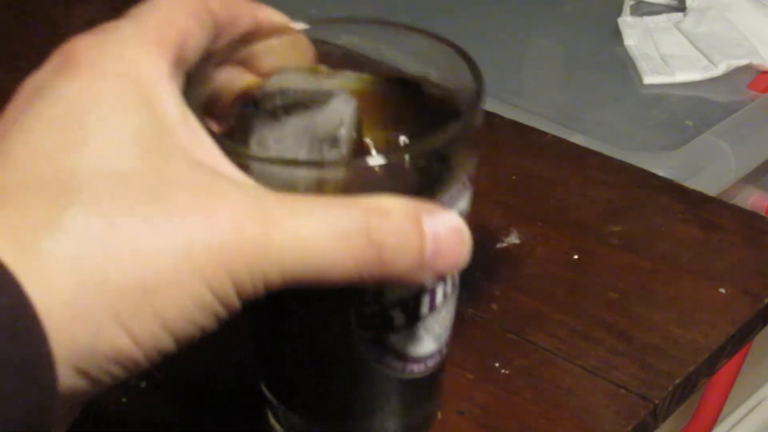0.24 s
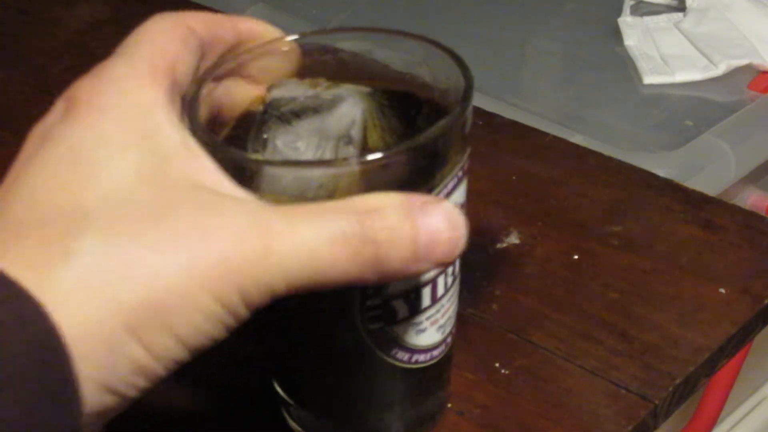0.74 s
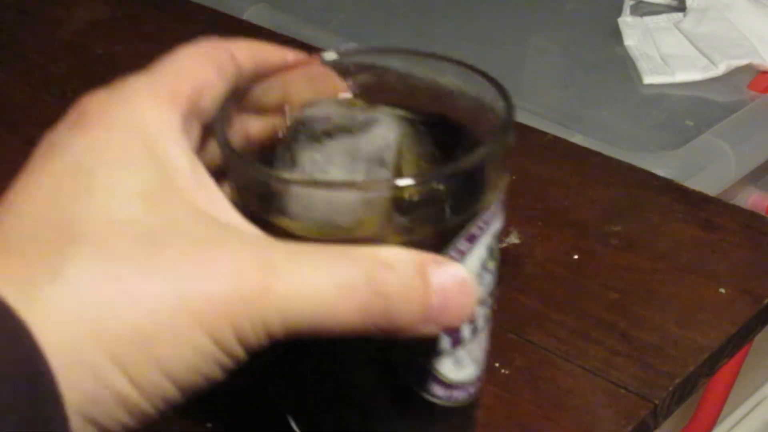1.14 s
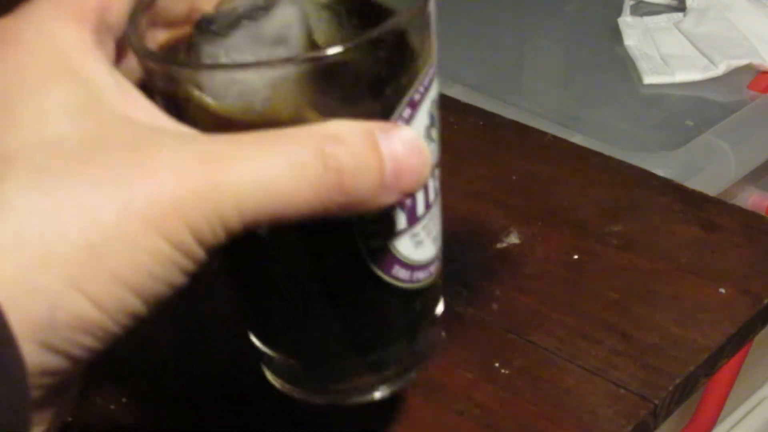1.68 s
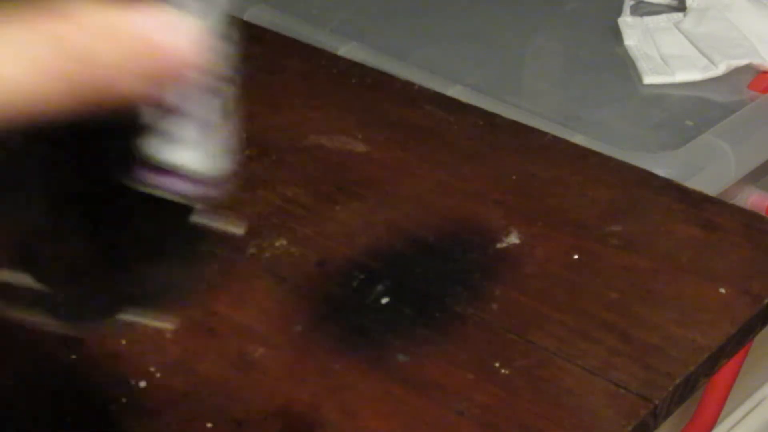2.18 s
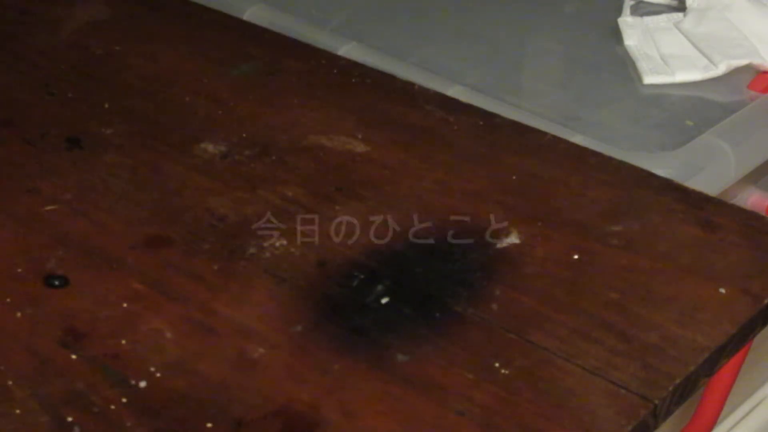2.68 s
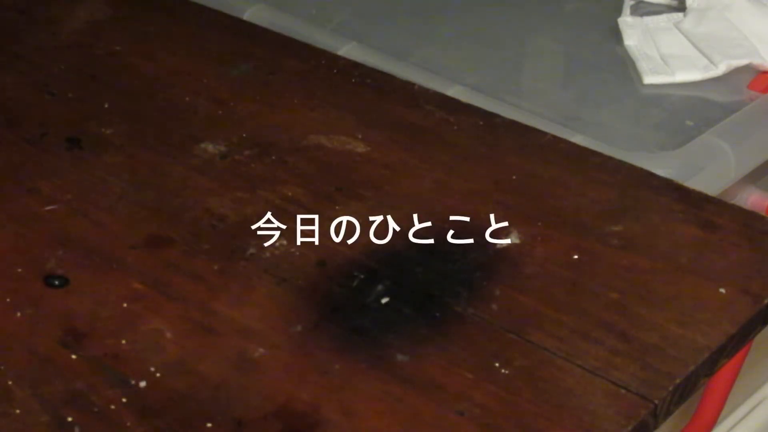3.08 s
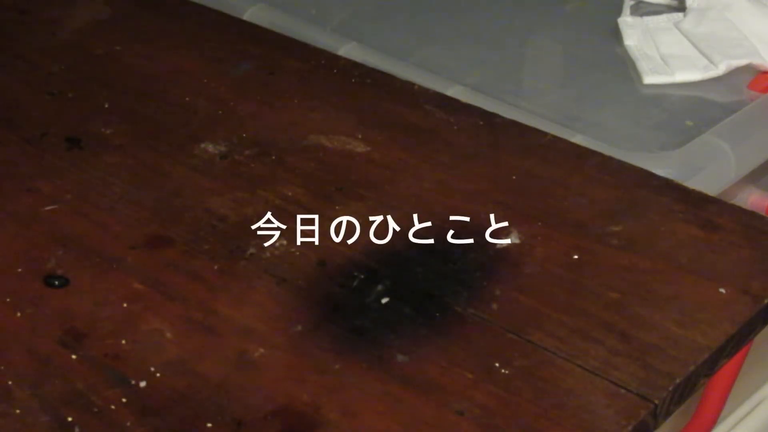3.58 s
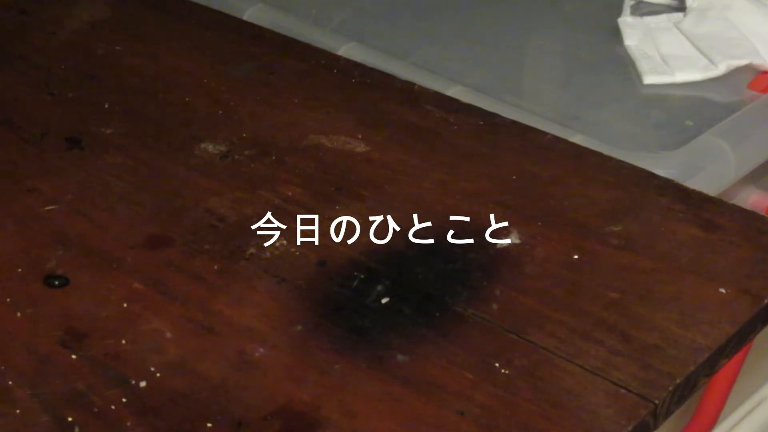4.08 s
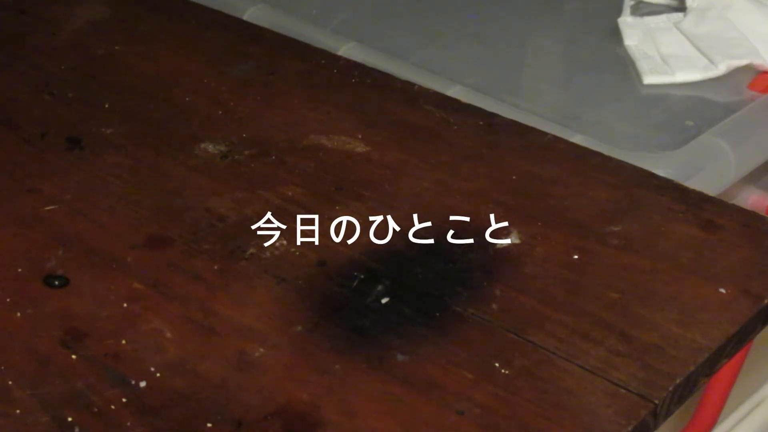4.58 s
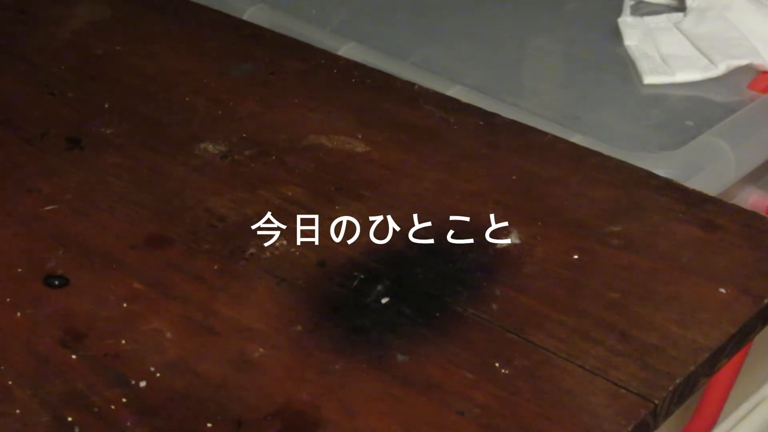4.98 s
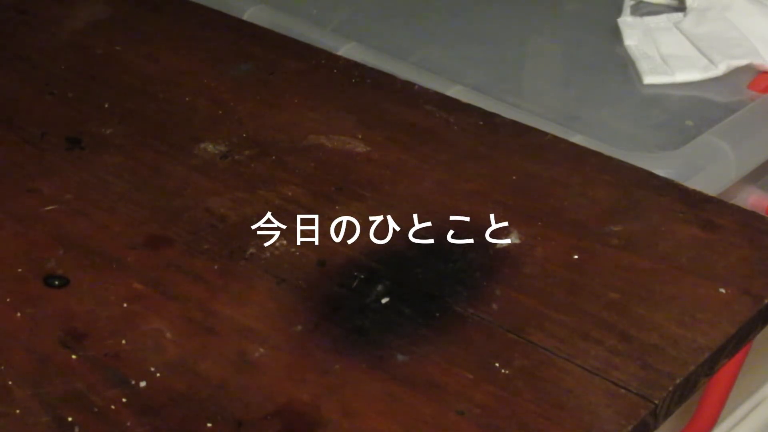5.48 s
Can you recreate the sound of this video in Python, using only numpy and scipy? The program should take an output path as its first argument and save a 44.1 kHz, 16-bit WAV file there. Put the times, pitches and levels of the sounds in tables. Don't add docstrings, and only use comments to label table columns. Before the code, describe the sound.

Ice cubes clink in a hand-held drink, the glass thuds onto a wooden table, then rattles as it is lifted away, leaving quiet dripping and motor hum.

```python
import sys
import numpy as np
from scipy import signal
from scipy.fft import rfft, irfft
from scipy.io import wavfile
from scipy.ndimage import uniform_filter1d, map_coordinates

SR = 44100
rng = np.random.default_rng(int(sys.argv[2]) if len(sys.argv) > 2 else 0)


def ratio(d):
    e = np.asarray(d, float) / 20
    return 10 ** e


def wav_out(sig):
    wavfile.write(sys.argv[1], SR, np.round(np.clip(np.atleast_2d(sig).T, -1, 1) * 32767).astype(np.int16))


N = 253134


def ice():
    # start in seconds, peak in dB, wall pitch in Hz, cube over wall in dB,
    # cube pitch in Hz.
    lowering = [(.002, -38.5, 2170, -3, 3020), (0.0505, -29.5, 2050, 8.5, 3400),
                (0.0542, -20, 2290, 0.5, 3040), (.0741, -19.5, 2110, -3, 2680),
                (0.0812, -28.5, 1960, 4.5, 3120), (0.09, -29, 2240, -11, 3330), (.118, -23, 2180, 3, 2880),
                (0.1686, -32, 2110, 8.5, 3670), (.219, -39, 2200, -4, 3090), (0.2699, -24, 2140, -1, 2770),
                (0.2768, -30, 2180, 5, 4040), (.2844, -29, 2270, -9, 3980), (0.2908, -27, 2140, -.6, 2770),
                (.333, -28.5, 2110, 2.5, 2860), (.365, -40.5, 2090, 1.5, 4140),
                (.4546, -41, 2190, 3.5, 3290)]
    # start in seconds, peak in dB, wall pitch in Hz, cube over wall in dB.
    gripping = [
        (1.0225, -40, 2280, -6),
        (1.0334, -39, 2000, -1),
        (1.0636, -27, 2150, -2),
        (1.105, -27.5, 2100, -4),
        (1.2261, -41, 2170, -11),
        (1.278, -42, 2460, -7),
        (1.327, -40, 2200, 10.5),
        (1.385, -44, 2420, 5),
        (1.3975, -34, 2080, -13),
    ]
    # start in seconds, peak in dB, wall pitch in Hz, cube over wall in dB.
    lifting = [(1.4002, -24.5, 2080, -4.5), (1.411, -36, 2120, -4), (1.448, -22, 2170, -0.4),
               (1.464, -32, 2103, -7), (1.4775, -27.5, 2110, -2.5), (1.502, -27.5, 2120, -3),
               (1.5196, -31, 2010, -2), (1.5431, -31, 2150, -1.5), (1.5698, -31, 2180, -13),
               (1.5834, -27, 2040, -8), (1.5945, -35, 2103, -2), (1.615, -28, 2200, 0.5),
               (1.679, -23.5, 2230, -5), (1.7107, -30, 2080, -1), (1.7297, -30, 2110, -8),
               (1.734, -34, 2200, -10), (1.7432, -28, 2120, 0.5), (1.7647, -25, 2160, -10),
               (1.7696, -15, 2100, -8), (1.7795, -33, 2190, -19), (1.7864, -29.5, 2136, -10),
               (1.8351, -31, 2170, -18), (1.8492, -12.5, 2190, 5.5), (1.857, -30, 2010, -18),
               (1.8634, -27, 2030, -11), (1.8798, -33, 2050, -6), (1.891, -28, 2150, -11),
               (1.8974, -35, 2050, -2), (1.9135, -32, 2100, -2), (1.925, -25.5, 2200, -7)]
    # start in seconds, peak in dB, wall pitch in Hz, cube over wall in dB,
    # cube pitch in Hz.
    tilted = [
        (5.5353, -20, 2340, -7, 3000),
        (5.541, -34, 2400, -1, 3050),
    ]
    # level under the first in dB, pitch in Hz.
    second_levels = (-18, -8, -15, -16)
    second_pitches = (5010, 5010, 5000, 5480)
    slosh_levels = (-12, -21, -30, -40)
    rim_s = [.0816, .2914, 1.5432, 1.7108, 1.7424, 1.857, 1.8974]

    out, t = np.zeros(N), np.arange(SR // 10) / SR
    phases = zip((lowering, gripping, lifting, tilted), second_levels, second_pitches, slosh_levels)
    for knocks, phase_second_db, second_hz, slosh_db in phases:
        for s, db, wall_hz, cube_db, *own_hz in knocks:
            second_db = phase_second_db + 0.64 * (cube_db + 6.5) + 3.5 * rng.standard_normal()
            if np.abs(np.subtract(rim_s, s)).min() < .003:
                second_db += 9.5
            third_db = 0.2 * second_db - 19 + 2.5 * rng.standard_normal()
            cube_hz = own_hz[0] if own_hz else 2970 * np.exp(0.078 * rng.standard_normal())
            clink = glass_wall(t, wall_hz, second_hz, second_db, third_db)
            clink += ice_cube(t, cube_hz, cube_db)
            clink += ring(t, 1140 * (1 + 0.1 * rng.standard_normal()), slosh_db, 0.016, 0.00096)
            clink += scrape(t, cube_hz, cube_db, third_db)
            add(out, s + .001, ratio(db + 2.5) * clink)
    return out


def glass_wall(t, hz, second_hz, second_db, third_db):
    wall_t60 = (0.019, 0.018, 0.010)
    shift = rng.standard_normal(4)
    wall = ring(t, hz, 0, wall_t60[0] * (2100 / hz) ** 3, .0004) * flutter(t, depth=.4)
    wall += ring(t, hz * (1.122 + 0.1 * shift[0]), -9, 0.019, 0.00039)
    second = ring(t, second_hz * (1 + .008 * shift[1]), second_db, wall_t60[1], .0002)
    wall += second * flutter(t, depth=.45)
    wall += ring(t, 8700 * (1 + .02 * shift[2]), third_db, wall_t60[2], .0003)
    return wall


def ice_cube(t, hz, db):
    # pitch in Hz, level in dB, decay to -60 dB in seconds.
    cube_modes = [(1020, -43, .012), (1430, -22, 0.013), (2566, -9, 0.02), (3050, -14, 0.015),
                  (3344, -1, 0.006), (3900, -5, 0.012), (4690, -6.5, 0.0081), (5900, -2.5, 0.0079),
                  (7380, -15, 0.008)]
    cube = ring(t, hz, db - 3.0, 0.012, 0.00043)
    for mode_hz, mode_db, t60 in cube_modes:
        detune, chance = rng.standard_normal(2)
        cube += ring(t, mode_hz * (1 + 0.067 * detune), db - 10.0 + mode_db + 2.0 * chance, t60, 0.00026)
    return cube


def scrape(t, cube_hz, cube_db, third_db):
    grit = ratio(-60 * t / [[.02], [.018]]) * rng.standard_normal((2, len(t)))
    rub = ratio(cube_db + 5.0) * band(grit[0], 0.76 * cube_hz, 1.05 * cube_hz)
    rub += ratio(third_db + 6.0) * band(grit[1], 4100, 14000)
    crack = band(ratio(cube_db + 7.5 - 60 * t / 0.00067), 2000, 7300)
    return band(band(rub - crack, 1880, 9600), 1920, 10200)


def table():
    # start in seconds, peak in dB,
    # softness (highest pitch reached) in Hz.
    set_down = [(.5638, -10, 5900), (0.5714, -16.5, 5000), (0.5796, -17.5, 1520), (0.6158, -25.5, 500),
                (.6225, -32, 900), (0.632, -33.5, 600), (.643, -49, 800), (.657, -41, 300),
                (5.564, -45, 600), (5.611, -46, 898), (5.675, -43, 600)]
    # pitch in Hz, level in dB.
    table_modes = [(90, -20), (135, -17), (195, -10), (238, -22.5), (295, -8), (409, 0.5), (528, 2.5),
                   (673, 2.5), (782, -0.5), (860, -6), (950, -14), (1032, -4), (1168, 4.5), (1297, 1.5),
                   (1440, -10), (1560, -17), (1696, -10), (1969, -4), (2130, -9), (2370, -10.5), (2690, -14),
                  (3030, -23), (3400, -20.5), (3700, -28)]
    out, t = np.zeros(N), np.arange(SR // 5) / SR
    board = np.zeros(len(t))
    for hz, mode_db in table_modes:
        board += ring(t, hz, mode_db, 0.045 * (500 / hz) ** 0.32, 0.00078, rng.uniform(0, 2 * np.pi))
    for s, db, soft_hz in set_down:
        jar = ratio(-18 - 60 * t / 0.1) * band(rng.standard_normal(len(t)), 1800, 11000)
        add(out, s, ratio(db) * band(board + jar, 80, soft_hz))
    return out


def drops():
    # start in seconds, peak in dB, low part in dB.
    near = [(.0954, -34, -3), (.1124, -35, -10), (.1265, -27.5, -8.5), (.2324, -35, -6), (.3884, -38, -15),
            (.636, -38, -3), (.6631, -30, -11), (.9861, -33.5, -7), (1.5213, -36, -2), (1.6235, -34, -23),
            (1.6529, -35.5, -2), (2.0014, -38, -4), (2.5718, -37, -15), (2.5369, -38, 1.5),
            (2.6934, -40.5, 3), (3.0505, -33.5, -22), (3.1262, -36, -7), (3.1326, -35, -1.5),
            (4.1882, -36, -5), (3.501, -32, -25), (3.8949, -35, -22), (3.9398, -49.5, 10),
            (4.371, -38, -1.5), (4.6561, -36, -11), (4.7934, -33.5, -16), (4.9964, -42, 3.5),
            (5.0197, -35, -14), (5.2194, -36, -6), (5.2982, -33.5, -6), (5.4888, -44.5, 6)]
    out, t = np.zeros(N), np.arange(SR // 10) / SR
    count = 70
    slots = (np.arange(count) + rng.random(count)) * N / SR / count
    faint = [(s, -41 + 2.5 * rng.standard_normal(), -13) for s in slots]
    for s, db, low_db in [*near, *faint]:
        hz = 6860 * np.exp(0.23 * rng.standard_normal())
        snap = ratio(-60 * t / 0.011) * rng.standard_normal((2, len(t)))
        drop = band(snap[0], 0.68 * hz, 14000)
        drop += ratio(low_db + 12.0) * band(snap[1], 1200, 3040)
        drop += ring(t, hz, -6, .006, .0001)
        add(out, s + .0006, ratio(db - 1.5) * drop)
    return out


def chink():
    # start in seconds, peak in dB.
    touches = [
        (2.6803, -30),
        (2.6884, -34),
        (2.6984, -33),
    ]
    # pitch in Hz, level in dB, decay to -60 dB in seconds.
    metal_modes = [(2540, -8, 0.017), (4320, -13.5, 0.04), (6430, -9, 0.046), (6900, -6, .02)]
    out, t = np.zeros(N), np.arange(SR // 10) / SR
    for s, db in touches:
        for hz, mode_db, t60 in metal_modes:
            add(out, s, ratio(db) * ring(t, hz, mode_db, t60, 0.0013) * flutter(t, depth=0.61))
    return out


def drone():
    # time in seconds, level in dB.
    motor_level = [(0, -43.5), (.36, -40), (.53, -51), (.77, -45), (.95, -54), (1.2, -44), (1.51, -51.5),
                   (1.96, -42.5), (2.54, -40.5), (2.84, -44.5), (3.34, -41.5), (3.6, -40.5), (3.72, -37),
                   (4.29, -37.5), (4.5, -50.5), (4.62, -38), (4.83, -42.5), (5.74, -38.5)]
    # middle in seconds, half length in seconds, level in dB.
    octave_swells = [(0, 0.13, -60), (.45, 0.45, -58.5), (.76, 0.042, -56), (1.03, 0.02, -54),
                     (1.85, 0.41, -50.5), (2.45, 0.24, -53), (3.1, 0.17, -53), (4.0, 0.24, -53.5),
                     (5.35, 0.37, -55.5)]
    db, = curves(motor_level)
    hz = 111.75 + 7 * np.exp(-np.arange(N) / SR / 2.4)
    turn = 2 * np.pi * np.cumsum(hz) / SR + 0.04 * wobble(13)
    tone = ratio(db + 0.18 * wobble(22.0)) * np.sin(turn)
    octave = swells(octave_swells, base_db=-65.5) * ratio(.9 * wobble(25)) * np.sin(2 * turn + .3 * wobble(15))
    return np.sqrt(2) * (tone + octave)


def air():
    # frequency in Hz, level in dB per Hz.
    patter_spectrum = [(1760, 0.5), (3000, 0), (4220, -4), (8160, -2.5), (13300, -9), (15000, -12),
                       (15800, -32.5)]
    body_spectrum = [(160, -35), (280, -2.5), (531, -2), (624, -2.5), (937, 1.5), (1070, -1.5), (1880, -5),
                     (2160, -6.5), (4500, -23.5), (5850, -57), (9900, -120)]
    rumble_spectrum = [(60, -42), (90, -6), (110, 2), (150, 1.5), (250, -6), (350, -11), (600, -32.5)]
    traffic_spectrum = [(15, -40), (35, -10), (50, -12), (75, -3), (95, -2), (130, -57)]
    # time in seconds, level in dB.
    patter_level = [(0, -50), (.5, -52), (1.1, -50.5), (2.0, -51.5), (2.5, -48.5), (3.5, -52), (4.5, -52.5),
                    (5.3, -51.5), (5.74, -50.5)]
    # middle in seconds, half length in seconds, level in dB.
    passes = [(0, 0.16, -55), (.5, 0.19, -62), (.88, .06, -62), (1.12, 0.027, -57), (2.86, .1, -64),
              (4.29, .15, -53), (4.97, .1, -58), (5.42, .11, -53), (5.74, .1, -58)]
    swell = wobble(18)
    patter_db = curves(patter_level)[0] + 0.25 * wobble(4.39) + 0.88 * swell
    patter = ratio(patter_db) * rush(patter_spectrum, patchy_db=1.5, spiky_db=1.5)
    body_db = -53.5 + 0.5 * wobble(3.64) + 0.35 * swell
    body = ratio(body_db) * rush(body_spectrum, patchy_db=1.1, spiky_db=1.1)
    rumble = ratio(-50.5 + 0.47 * wobble(3.1)) * rush(rumble_spectrum, patchy_db=2.1, spiky_db=2.4)
    traffic = swells(passes, base_db=-63) * rush(traffic_spectrum, patchy_db=4.0, spiky_db=-2.0)
    return patter + body + rumble + traffic


def room(x):
    # frequency in Hz, decay to -60 dB in seconds.
    room_t60 = [(200, 0.099), (2000, 0.062), (10000, 0.074)]
    hz, t, z = signal.stft(rng.standard_normal(SR // 4), SR, nperseg=256)
    tail = signal.istft(z * ratio(-60 * t / along(room_t60, hz)[:, None]), SR, nperseg=256)[1]
    late = np.pad(x, (120, 0))
    return signal.fftconvolve(late, tail / np.linalg.norm(tail))[:N]


def ring(t, hz, db, t60, attack, phase=0):
    return ratio(db - 60 * t / t60) * np.sin(2 * np.pi * hz * t + phase) * (1 - np.exp(-t / attack))


def flutter(t, depth):
    return 1 + depth * unit(band(rng.standard_normal(len(t)), 40, 400))


def rush(spectrum, patchy_db, spiky_db):
    z = signal.stft(rng.standard_normal(N), nperseg=256)[2]
    field = uniform_filter1d(rng.standard_normal(z.shape), 24, 0)
    field = uniform_filter1d(field, 4, 1)
    x = signal.istft(z * ratio(patchy_db * unit(field)), nperseg=256)[1][:N]
    x = x * ratio(spiky_db * wobble(400))
    shape = ratio(along(spectrum, np.fft.rfftfreq(N, 1 / SR)))
    return unit(irfft(rfft(x) * shape, N))


def swells(rows, base_db):
    t = np.arange(N) / SR
    return ratio(base_db) + sum(ratio(db) * np.exp(-((t - s) / half) ** 2) for s, half, db in rows)


def wobble(rate):
    return map_coordinates(rng.standard_normal(int(N * rate / SR) + 4), [np.arange(N) * rate / SR])


def curves(rows):
    s, *cols = np.transpose(rows)
    return [np.interp(np.arange(N) / SR, s, c) for c in cols]


def along(points, hz):
    f, v = np.transpose(points)
    return np.interp(np.log(hz + 1), np.log(f + 1), v)


def band(x, lo_hz, hi_hz):
    return signal.sosfilt(signal.butter(2, [lo_hz, min(hi_hz, .45 * SR)], "band", fs=SR, output="sos"), x)


def unit(x):
    return x / np.sqrt(np.mean(x ** 2) + 1e-20)


def add(track, s, sound):
    part = track[round(s * SR):][:len(sound)]
    part += sound[:len(part)]


def scene():
    glass, board = ice(), table()
    near = glass + board + ratio(-9.5) * room(glass) + ratio(-13) * room(board)
    far = drops() + chink() + drone() + air()
    return (near + far)[None]


def top_cut(x):
    return signal.sosfilt(signal.butter(12, 15990, fs=SR, output="sos"), x)


def record(dry):
    squeezed = dry / (1 + np.abs(dry / .75) ** 4) ** (1 / 4)
    soft = signal.sosfilt(signal.ellip(12, .5, 70, 15050, fs=SR, output="sos"), squeezed)
    return top_cut(soft)


dry = scene()
out = record(dry)
wav_out(out)
```